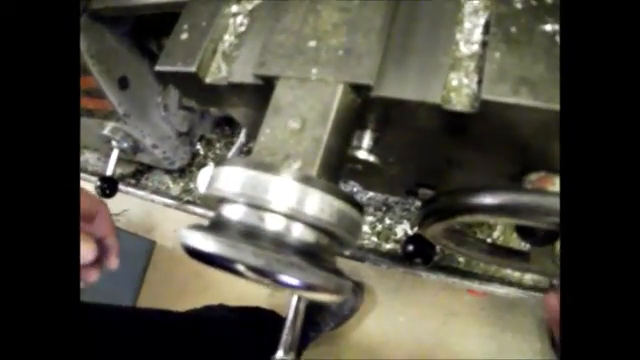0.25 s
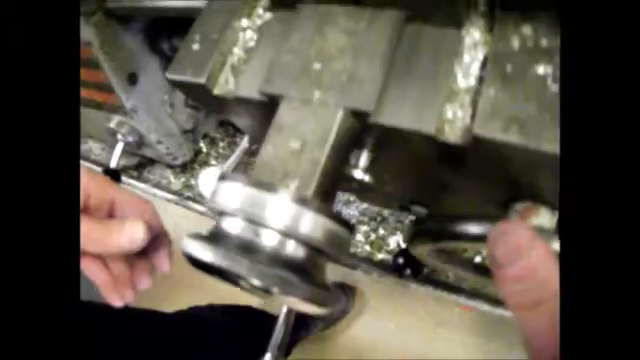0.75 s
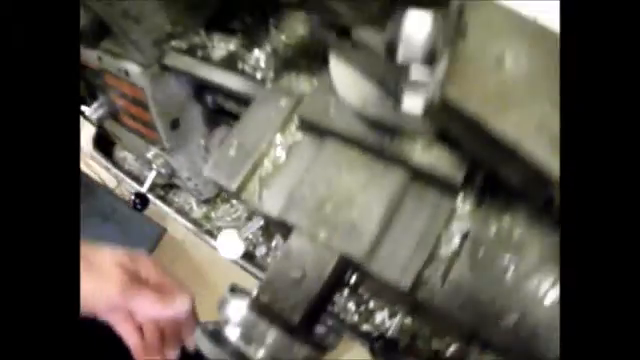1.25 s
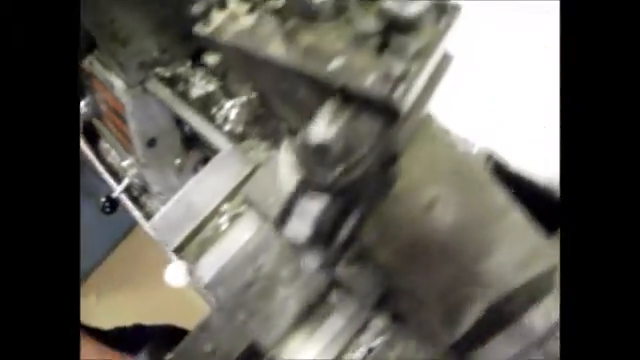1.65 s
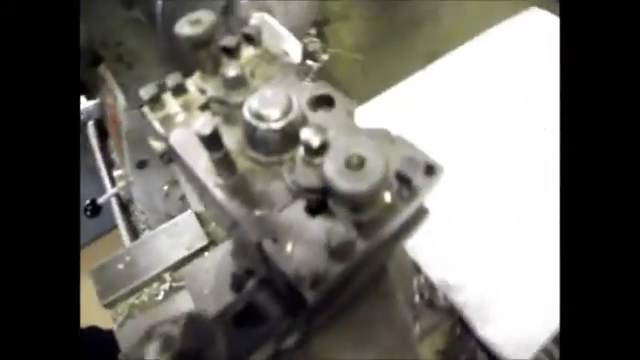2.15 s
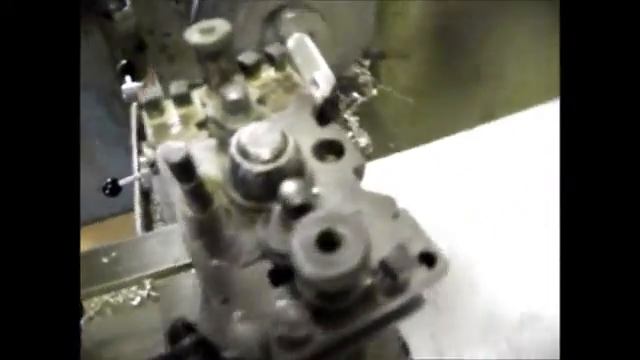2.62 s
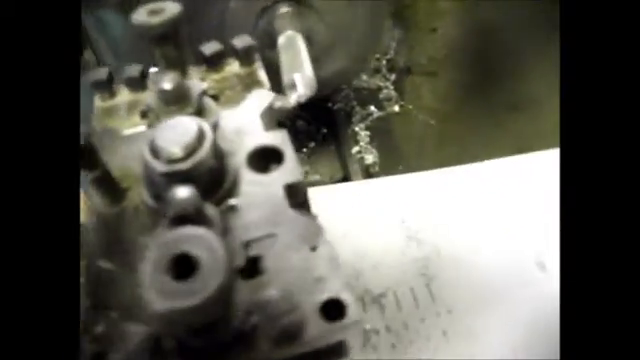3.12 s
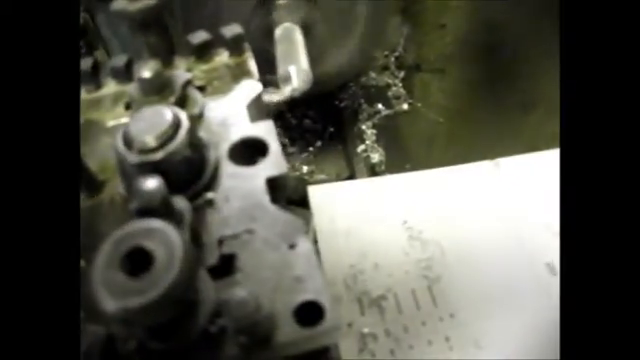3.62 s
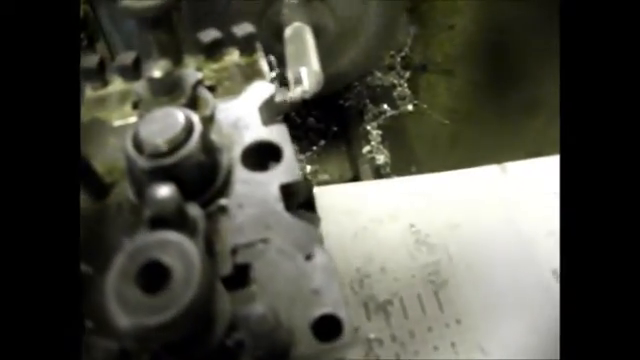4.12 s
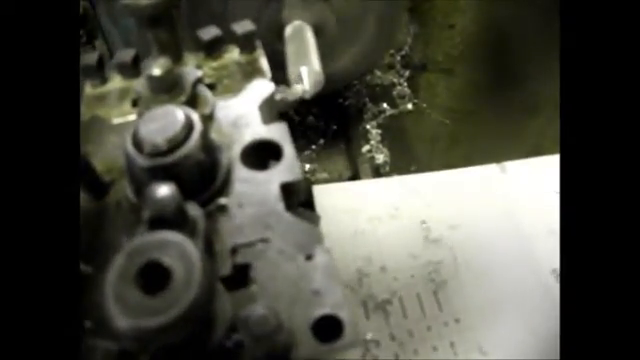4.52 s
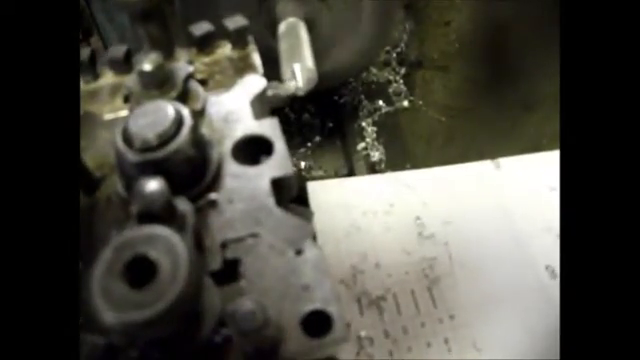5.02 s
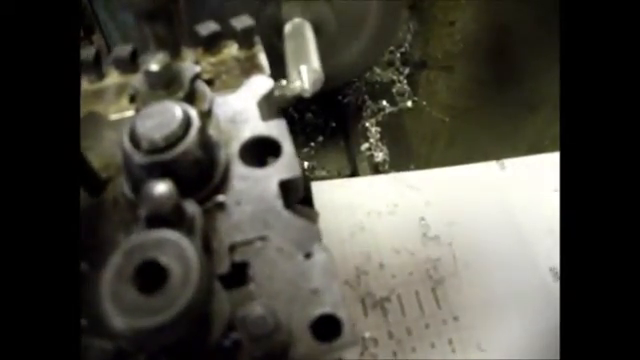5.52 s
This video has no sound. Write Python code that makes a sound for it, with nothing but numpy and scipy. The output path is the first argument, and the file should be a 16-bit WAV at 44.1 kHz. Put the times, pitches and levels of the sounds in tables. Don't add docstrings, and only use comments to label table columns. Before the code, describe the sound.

Almost at once a bouncing metallic switch clack breaks faint room noise, and a geared lathe shudders and spins up with a rising howl. It then runs continuously: nasal gear tone, rough metallic rattle, rapid worn-tooth knocks, high squealing cut. The close handheld microphone is narrow, distorted and level-riding; the tone shifts slightly as it moves to the cutting tool.

```python
import sys
import numpy as np
from scipy import signal
from scipy.fft import next_fast_len
from scipy.io import wavfile
from scipy.ndimage import uniform_filter1d

SR = 44100
rng = np.random.default_rng(int(sys.argv[2]) if len(sys.argv) > 2 else 0)


def wav_out(sig):
    wavfile.write(sys.argv[1], SR, np.round(np.clip(np.atleast_2d(sig).T, -1, 1) * 32767).astype(np.int16))


def magnitude_from_level(level_db):
    exponent = np.asarray(level_db, float) / 20
    return 10 ** exponent


N = 254456
T = np.arange(N) / SR
TEETH, SPINDLE_RATIO = 48, 0.7

# frequency [Hz], density [dB per Hz].
SHOP_SPECTRUM = [(18, -35), (30, 6.5), (60, -20.5), (130, -3), (165, -7.5), (260, -18), (500, -22),
                 (1200, -28), (1950, -16), (2450, -23.5), (2950, -22), (3600, -32), (5100, -32.5),
                 (5600, -67)]
# centre [s], half length [s], level over the shop [dB].
HAND_MOVES = [
    (0.022, 0.013, 7),
    (0.125, 0.025, 6),
]
# time [s], level [dB].
CONTACT_BLOWS = [
    (0.1282, -5),
    (.1292, -15),
    (0.1302, 0.5),
    (0.1312, 6.5),
    (0.1376, -6),
    (0.141, -3),
    (0.152, -20),
]
# frequency [Hz], time to decay by 60 dB [s], level [dB].
CONTACTOR_MODES = [(1280, 0.011, -19.5), (1913, 0.0076, -3), (2360, 0.017, -5), (2200, 0.025, -5),
                   (2950, 0.015, 3), (5000, 0.018, -15)]
# frequency [Hz], density [dB per Hz].
RATTLE_SPECTRUM = [(12, -31), (30, -9), (55, -24), (150, -18.5), (400, -19), (680, -13), (880, -9),
                   (1200, -15), (1760, -6.5), (2370, -7), (3060, -1), (3770, -16), (5100, -30), (5600, -54)]
# frequency [Hz], width [Hz], rise [dB].
BED_RINGS = [(120.8, 25, 9), (267, 95, 6), (511, 96, 8), (958, 150, 2), (1381, 34, 7), (1609, 45, 5.5),
             (1985, 237, 5), (1903, 30, 3.5), (2000, 37, 0), (2174, 9.7, 5), (2267, 16, 7.5),
             (2314, 18, 1.5), (3349, 39, 5.5), (4380, 57, 7.5)]
# frequency [Hz], width [Hz], level [dB].
FRAME_MODES = [(135, 16, -0.5), (191, 20, 0.5), (237, 32, 2.5), (392, 23, -8), (496, 44, 6.5),
               (750, 35, -6), (1110, 58, -5)]
# frequency [Hz], level [dB].
HUM_LINES = [(168.4, -41), (198.5, -35.5), (105, -62.5)]
# multiple of its tooth rate, level [dB].
SPINDLE_ORDERS = [(1, -42), (2, -41), (3, -28), (4, -29.5), (5, -24.5), (6, -48.5), (7, -63)]
# multiple of its tooth rate, level [dB].
DRIVE_ORDERS = [(0.8326, -44), (1, -35.5), (1.5, -41.5), (1.998, -47), (3, -38.5), (4.001, -39)]
# frequency [Hz], width [Hz], level [dB].
COVER_PANELS = [(535, 35, 19), (700, 40, 7), (820, 40, 6), (1170, 90, 11)]
# share of a turn, ring [Hz], blow at first [dB], blow after the move [dB].
WORN_TEETH = [(.97, 885, -9, 0), (.58, 800, -12, -5), (.79, 880, 1, -5), (.43, 870, -7, -14),
              (.2, 990, -8, -9)]
# frequency [Hz], width [Hz], level [dB].
CASING_MODES = [(540, 85, -33), (711, 6.7, -4), (807, 22, -4), (860, 73, -11), (936, 39, -2.5),
                (1000, 16, -1.5), (1102, 8.6, 0.5), (1420, 17, -17), (1563, 16, 4), (1960, 17, 3.5),
                (1980, 27, 3.5), (2275, 17, 4.5), (3010, 100, -6.5)]
# time [s], share of the way from headstock to tool post [0-1].
CAMERA_WALK = [
    (0, 0),
    (1.1, .05),
    (1.5, .2),
    (1.9, .36),
    (2.1, .7),
    (2.4, .75),
    (3.0, 1.01),
    (5.77, 1.01),
]
# low edge [Hz], high edge [Hz], gain at the headstock [dB],
# gain at the tool post [dB], gain added by strain [dB].
CASING_PARTS = [(400, 1130, -1.5, -1.5, 13.5), (1410, 2300, -2.5, 0.2, -0.2), (2425, 2630, 3, -1.2, -8),
                (3600, 4000, 0.7, -1.2, 0)]


def evened(x):
    return x / np.sqrt(np.mean(x ** 2) + 1e-20)


def bell(centre_s, width_s):
    return np.exp(-((T - centre_s) / width_s) ** 2)


def strain():
    return bell(0.23, 0.069)


def walk():
    return np.interp(T, [row[0] for row in CAMERA_WALK], [row[1] for row in CAMERA_WALK])


def walked(near, far):
    return near + (far - near) * walk()


def wander(rate_hz):
    hop = 44
    noise = rng.standard_normal(N // hop + 600)
    coarse = signal.lfilter(*signal.butter(2, rate_hz / 500), noise)[500:]
    return np.interp(T, np.arange(len(coarse)) * hop / SR, evened(coarse))


def resonate(x, hz, width_hz):
    radius = np.exp(-np.pi * width_hz / SR)
    pole = radius * np.exp(2j * np.pi * hz / SR)
    return 2 * signal.lfilter([1 - radius], [1, -pole], x).real


def ringing(x, modes):
    return evened(sum(magnitude_from_level(db) * evened(resonate(x, hz, width)) for hz, width, db in modes))


def colour(x, spectrum, rings=()):
    hz = abs(np.fft.fftfreq(8192, 1 / SR))
    points_hz, points_db = np.transpose(spectrum)
    db = np.interp(np.log(hz + 1), np.log(points_hz + 1), points_db)
    for ring_hz, width, rise_db in rings:
        db = db + rise_db * np.exp(-((hz - ring_hz) / width) ** 2 * 2)
    log_gain = np.log(magnitude_from_level(np.maximum(db, -90)))
    taps = np.fft.ifft(np.exp(np.conj(signal.hilbert(log_gain)))).real[:4096]
    return signal.oaconvolve(x, taps)[:N]


def whine(passed, orders, waver_db, waver_hz):
    total = np.zeros(N)
    for order, db in orders:
        level = magnitude_from_level(db + waver_db * wander(waver_hz))
        total += level * np.cos(2 * np.pi * order * passed + 0.5 * wander(waver_hz))
    return np.sqrt(2) * total


def shop():
    level_db = -33 + sum(db * bell(s, half_s) for s, half_s, db in HAND_MOVES)
    duck = np.where(T > 0.14, 0.03, 1)
    return duck * magnitude_from_level(level_db) * evened(colour(rng.standard_normal(N), SHOP_SPECTRUM))


def switch():
    blows = np.zeros(N)
    for s, db in CONTACT_BLOWS:
        blows[round(s * SR)] = magnitude_from_level(db) * rng.choice([-1, 1])
    t = T[:4000]
    ring = sum(magnitude_from_level(db - 60 * t / t60) * np.sin(2 * np.pi * hz * t) for hz, t60, db in CONTACTOR_MODES)
    return magnitude_from_level(-2.5) * signal.oaconvolve(blows, ring)[:N]


def teeth_passed():
    top_hz, sag_hz, sag_s = 893.5, 0.7, 1.0
    start_s, spin_up_s, knock_s = 0.098, 0.1455, 4.03
    missing = np.where(T > start_s, bell(start_s, spin_up_s), 1)
    count = np.cumsum((top_hz + sag_hz * np.exp(-T / sag_s)) * (1 - missing)) / SR
    return count - np.interp(knock_s, T, count)


def rattle(passed):
    taps_per_s = 2500
    sizes = magnitude_from_level(2.2 * np.minimum(rng.exponential(1, N), 4))
    taps = sizes * rng.standard_normal(N) * (rng.random(N) < taps_per_s / SR)
    drive_swell = 0.5 * np.cos(2 * np.pi * passed / TEETH)
    spindle_swell = 0.6 * np.cos(2 * np.pi * passed * SPINDLE_RATIO / 44)
    swell_db = drive_swell + spindle_swell + 1.0 * wander(60)
    drive = (0.44 * evened(taps) + 0.89 * rng.standard_normal(N)) * magnitude_from_level(swell_db)
    jolt = bell(CONTACT_BLOWS[0][0], 0.018)
    level_db = -12 - 3 * strain() + 7.5 * jolt
    return magnitude_from_level(level_db) * evened(colour(drive, RATTLE_SPECTRUM, BED_RINGS))


def shudder():
    fade = np.clip((0.45 - T) / 0.034, 0, 1)
    return magnitude_from_level(-27 + 11 * strain()) * ringing(rng.standard_normal(N), FRAME_MODES) * fade


def motor():
    return whine(T, HUM_LINES, 2.6, 5)


def spindle_whine(passed):
    return magnitude_from_level(walked(3.5, 0.5)) * whine(passed * SPINDLE_RATIO, SPINDLE_ORDERS, 3.3, 8.9)


def gear_whine(passed):
    pull_in_s, pull_in_width_s = 0.316, 0.056
    shadow_db = -7 * np.sin(np.pi * walk() ** 2) ** 2
    level_db = walked(-0.5, 1.5) + shadow_db + 9.5 * bell(pull_in_s, pull_in_width_s)
    meshed = np.where(T > 0.222, 1, 0)
    tone = meshed * magnitude_from_level(level_db) * whine(passed, DRIVE_ORDERS, 0.52, 3.1)
    side = whine(passed * (TEETH + 2) / TEETH, [(1, 0)], 2, 4) * magnitude_from_level(walked(-25, -50))
    side *= np.interp(T, [pull_in_s, pull_in_s + pull_in_width_s], [0, 1])
    panels = sum(magnitude_from_level(db) * resonate(tone, hz, width) for hz, width, db in COVER_PANELS)
    return -(side + tone + panels)


def knocks(passed):
    blows, surges = np.zeros(N), np.zeros(N)
    moved = np.interp(walk(), [0.72, 1], [0, 1])
    surge_n = 760
    for share, hz, first_db, later_db in WORN_TEETH:
        at = np.flatnonzero(np.diff(np.floor(passed / TEETH - share)))
        chance_db = 2.65 * rng.standard_normal(len(at))
        blow_db = first_db + (later_db - first_db) * moved[at] + chance_db
        tooth = np.zeros(N)
        tooth[at] = magnitude_from_level(blow_db) * (T[at] > 0.3)
        blows += tooth
        surge = np.hanning(surge_n) * np.sin(2 * np.pi * hz * T[:surge_n])
        surges += signal.oaconvolve(tooth, surge, "same")
    return magnitude_from_level(-25) * ringing(blows, CASING_MODES) + magnitude_from_level(-23.0) * evened(surges)


def cut():
    a, b = (signal.lfilter(*signal.butter(2, 70 / (SR / 2)), v) for v in rng.standard_normal((2, N)))
    ring_hz = np.interp(walk(), [0.2, 0.55], [3125, 3005]) + 25 * wander(1.5)
    phase = 2 * np.pi * np.cumsum(ring_hz) / SR
    bite = np.interp(T, [0.45, 0.61], [0, 1])
    level = bite * magnitude_from_level(walked(-20.5, -20) + 1.7 * wander(60))
    return level * evened(a * np.cos(phase) + b * np.sin(phase))


def viewpoint(x):
    out = x.copy()
    for low_hz, high_hz, near_db, far_db, strain_db in CASING_PARTS:
        db = walked(near_db, far_db) + strain_db * strain()
        band_filter = signal.butter(3, [low_hz, high_hz], "band", fs=SR, output="sos")
        out += (magnitude_from_level(db) - 1) * signal.sosfiltfilt(band_filter, x)
    return out


def scene():
    passed = teeth_passed()
    effort = np.clip((T - 0.17) / 0.36, 0, 1)
    casing = rattle(passed) + effort * (spindle_whine(passed) + knocks(passed))
    machine = viewpoint(casing) + shudder() + effort * motor() + gear_whine(passed) + cut()
    switched_on = np.clip((T - 0.129) / 0.0023, 0, 1)
    return (shop() + switch() + switched_on * machine)[None]


def top_cut(x):
    return signal.sosfilt(signal.butter(12, 15800, fs=SR, output="sos"), x)


def record(dry):
    ride_from, ride_share, ride_s = 0.3, 0.45, 0.06
    slow = np.sqrt(2 * abs(uniform_filter1d(dry ** 2, round(ride_s * SR))))
    ridden = magnitude_from_level(2.5) * dry * (np.maximum(slow, ride_from) / ride_from) ** -ride_share
    knee, top = 0.6, 1.07
    envelope = abs(signal.hilbert(ridden, next_fast_len(N))[:, :N])
    size = uniform_filter1d(envelope, 30) + 1e-9
    held = np.minimum(size, knee) + (top - knee) * np.tanh(np.maximum(size - knee, 0) / (top - knee))
    low_pass = signal.firwin(301, 5380, window=("kaiser", 9), fs=SR)
    band = signal.oaconvolve(ridden * held / size, low_pass[None], "same")
    band = signal.lfilter(*signal.butter(1, 32, "high", fs=SR), band)
    mix = np.clip(band - 0.002, -1.0, 1.0)
    return top_cut(mix)


dry = scene()
out = record(dry)
wav_out(out)
```